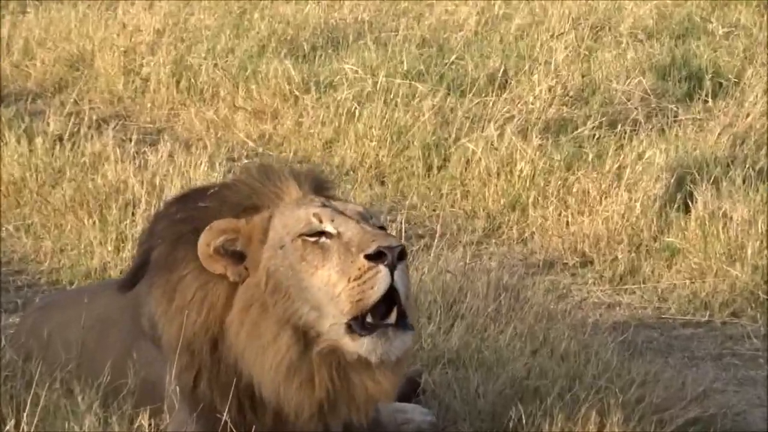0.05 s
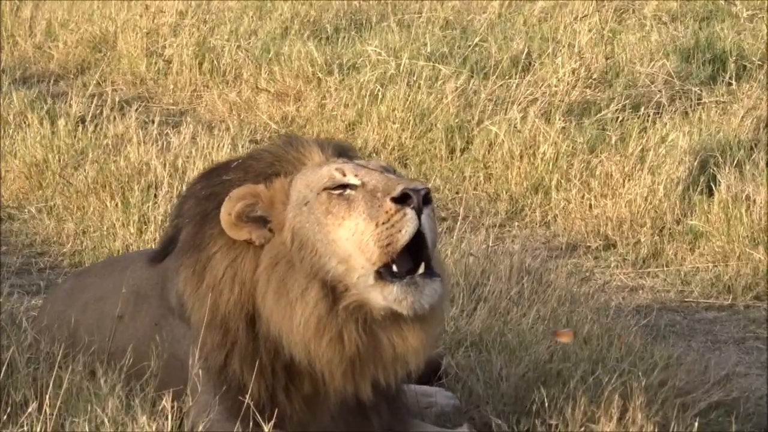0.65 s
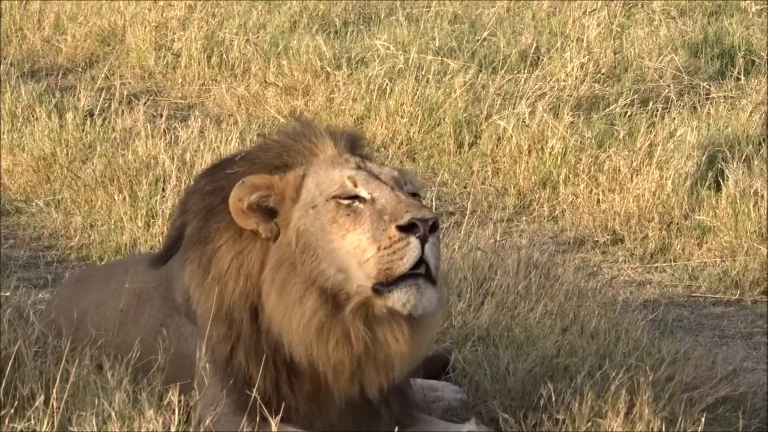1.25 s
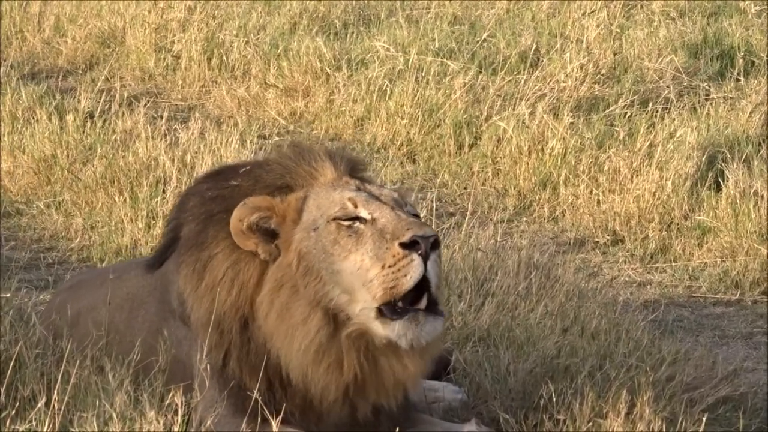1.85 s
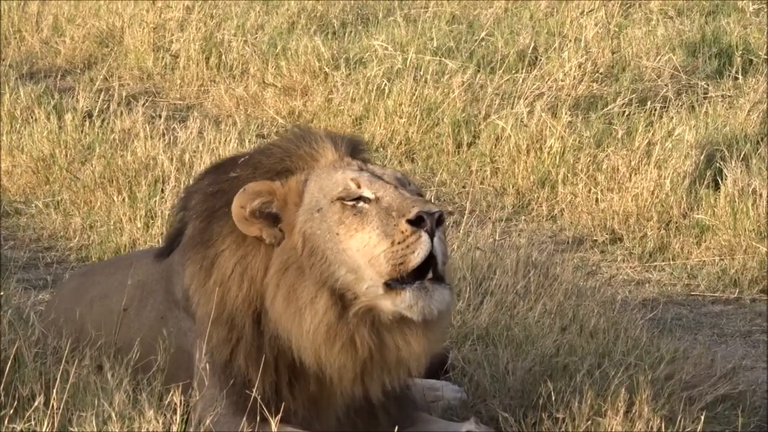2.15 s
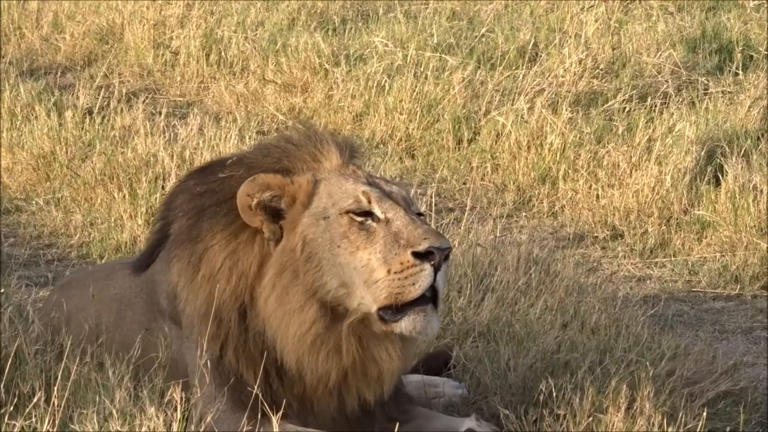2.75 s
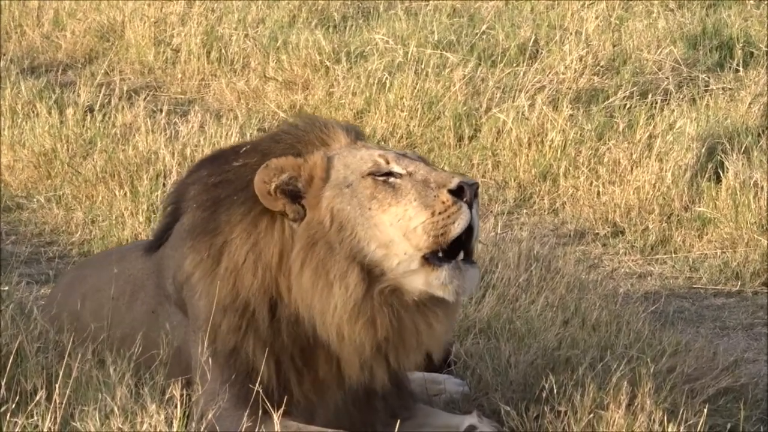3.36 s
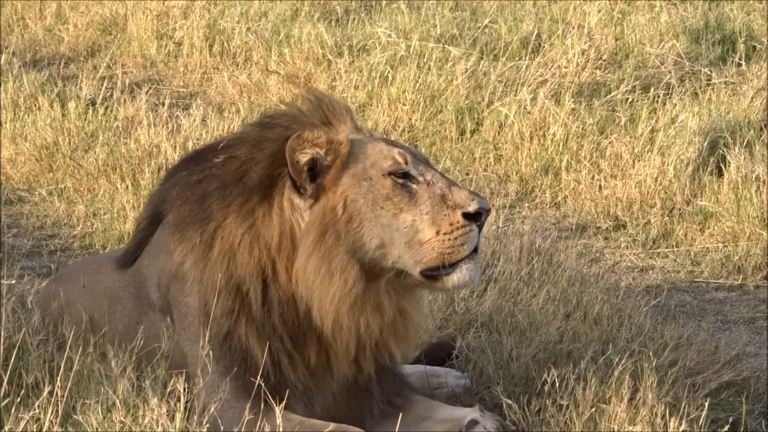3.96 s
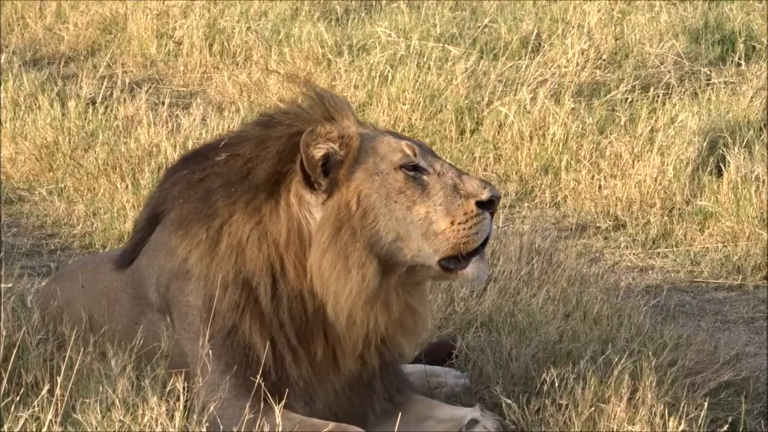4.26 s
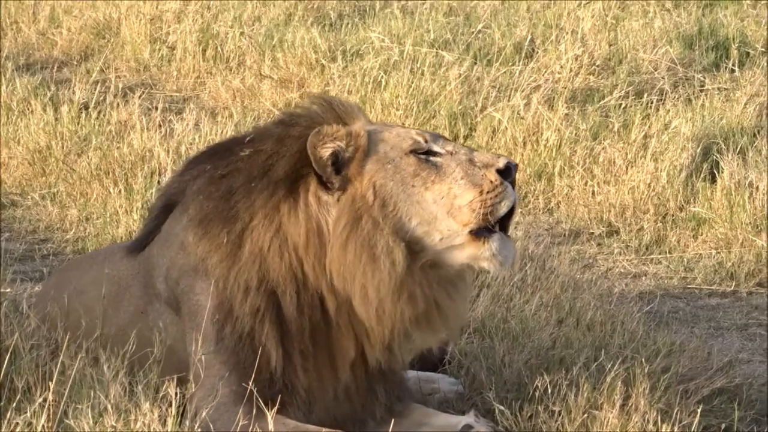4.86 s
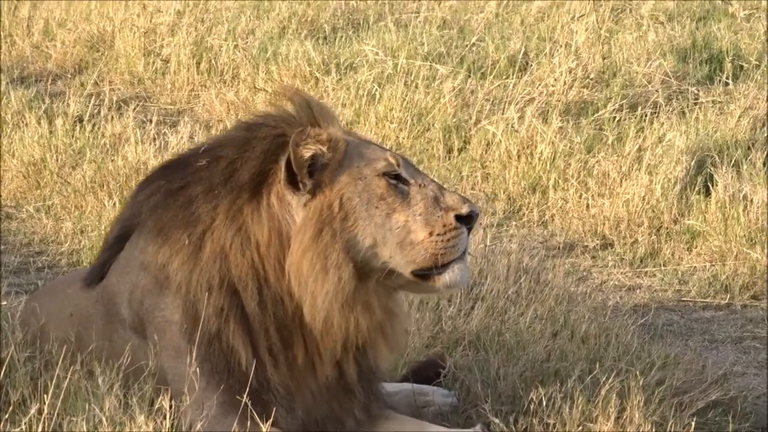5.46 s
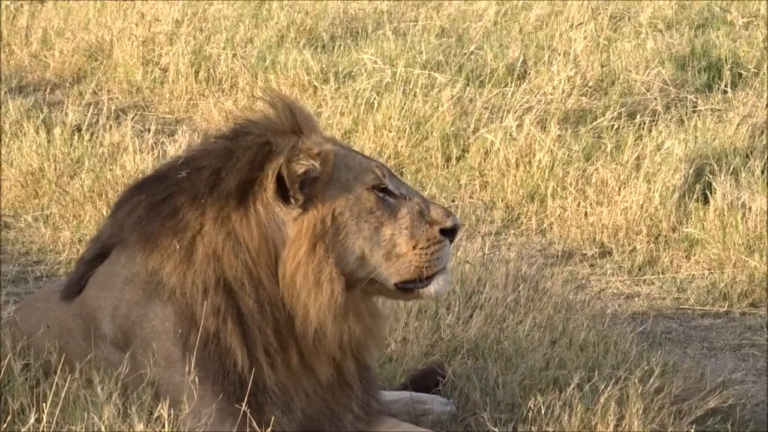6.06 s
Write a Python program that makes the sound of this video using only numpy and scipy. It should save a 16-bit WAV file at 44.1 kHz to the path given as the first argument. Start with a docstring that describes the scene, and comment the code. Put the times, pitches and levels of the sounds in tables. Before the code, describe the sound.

Close by outdoors, a lion roars once, then tapers into three rough grunts over a faint hiss.

```python
"""A dry snap sounds over the faint hiss of a plain, then a lion gives one long roar and three grunts.
The grunts are shorter and hoarser. Each call scoops up in pitch, holds, and sags after a last push of air.
The lion's slack vocal folds flap unevenly into a long throat; the open bush returns a low echo.
Dry grass rustles, something murmurs far off, a small bird chirps, and a dull tick comes last."""
import sys
import numpy as np
from scipy import signal
from scipy.fft import rfft, irfft
from scipy.io import wavfile
from scipy.ndimage import map_coordinates

SR = 44100
rng = np.random.default_rng(int(sys.argv[2]) if len(sys.argv) > 2 else 0)


def dump_mix(stems):
    """Bounce the given channels to the path in sys.argv[1] as a 16-bit WAV at rate SR."""
    frames = np.atleast_2d(stems).T  # one column per channel
    limited = np.clip(frames, -1, 1)  # hard clip at full scale
    pcm = np.round(limited * 32767).astype(np.int16)
    wavfile.write(sys.argv[1], SR, pcm)


N = 269892
T = np.arange(N) / SR
HZ = np.fft.rfftfreq(N, 1 / SR)


def gain_of(db):
    """Turns decibels into a factor to multiply by."""
    return 10 ** (np.asarray(db) / 20)


def evened(x):
    """Scales a sound to an average strength (rms) of 1."""
    return x / np.sqrt(np.mean(x ** 2) + 1e-20)


def steadied(x, span_s):
    """Evens out loudness changes slower than span_s and keeps the faster flutter."""
    window = signal.windows.hann(int(span_s * SR) | 1)
    power = signal.fftconvolve(x ** 2, window / window.sum(), "same")
    return x / np.sqrt(np.abs(power) + 1e-14)


def spectrum(points):
    """Joins (frequency, value) points into a curve over all frequencies."""
    hz, value = np.transpose(points)
    return np.interp(np.log(HZ + 1), np.log(hz + 1), value)


def add(mix, start_s, sound):
    """Mixes a sound in at the given time."""
    part = mix[round(start_s * SR):][:len(sound)]
    part += sound[:len(part)]


def bump(t, half_s):
    """A smooth swell of height 1 around time zero."""
    return np.exp(-(t / half_s) ** 2)


def noise(gain):
    """Noise of strength 1, shaped by a gain for each frequency."""
    return evened(irfft(rfft(rng.standard_normal(N)) * gain, N))


def wander(hz):
    """A random wobble, up to about hz times a second."""
    return noise(1 / (1 + (HZ / hz) ** 4))


def humps(modes):
    """Gain curve of resonances, the places where something rings: (frequency, width, level)."""
    return np.sqrt(sum(gain_of(db) ** 2 / (1 + ((HZ - hz) / (0.48 * width)) ** 2) ** 2
                       for hz, width, db in modes))


def colour(x, gain):
    """Filters by a gain curve so that resonances ring after each pulse, never before it."""
    cepstrum = irfft(np.log(gain / gain.max() + 1e-5), N)
    return irfft(rfft(x) * np.exp(rfft(2 * cepstrum[:N // 2], N)), N)


def resonate(x, hz, width):
    """Rings one resonance that slides along the curve hz."""
    spin = np.exp(2j * np.pi * np.cumsum(hz) / SR)
    decay = np.exp(-np.pi * width / SR)
    return 2 * (spin * signal.lfilter([1 - decay], [1, -decay], x / spin)).real


def above(x, hz):
    """Keeps only what lies above hz."""
    return signal.sosfilt(signal.butter(4, hz, "highpass", fs=SR, output="sos"), x)


def bend(x, factor):
    """Slides every resonance of a steady sound by a slowly changing factor."""
    return map_coordinates(x, [np.cumsum(factor)], order=3, mode="mirror")


# The tone colour of the plain's hiss: (frequency [Hz], relative level [dB])
HISS_SPECTRUM = [(40, -38), (210, -17.5), (370, -14), (450, 1.5), (570, 0), (730, -5), (800, 1.5),
                 (900, -11.5), (1080, -8.5), (1230, 2), (1700, -14.5), (2080, -15), (2350, 0.5), (2490, -8),
                 (2760, 0), (3200, -16), (4700, -20.5), (6400, -40)]


def plain_hiss(peak_s=3.05, peak_db=-54, sag_db=-5):
    """A faint, wide hiss that swells once, slowly."""
    shape = gain_of(spectrum(HISS_SPECTRUM)) / (1 + (HZ / 7500) ** 8)
    hiss = 0.44 * noise(shape) + 0.63 * np.array([noise(shape) for side in range(2)])
    fizz = np.array([noise(humps([(9950, 4600, 0)])) for side in range(2)])
    swell_db = peak_db + sag_db * ((T - peak_s) / peak_s) ** 2
    return (hiss + gain_of(-23.5) * fizz) * gain_of(swell_db + .5 * wander(6.7))


# When the far murmur is heard: (start [s], end [s], level [dB])
MURMURS = [(0, 2.5, -64), (3.051, 3.92, -57.5)]


def far_murmur(fade_db_per_s=121):
    """A faint low murmur that comes and goes far off."""
    loudness = sum(gain_of(db - fade_db_per_s * abs(T - np.clip(T, start, end)))
                   for start, end, db in MURMURS)
    murmur = noise(humps([(144, 33, 4), (200, 30, -20.5), (307, 520, -14.5)]))
    return steadied(murmur, .25) * loudness


# Stirrings of the grass: (start [s], length [s], level [dB])
RUSTLES = [(2.255, 0.036, -56.5), (2.952, 0.087, -58), (3.573, 0.042, -57.5)]


def grass_rustles():
    """Dry grass rustles in short swells of high noise."""
    loudness = np.zeros(N)
    for start, length, db in RUSTLES:
        add(loudness, start, gain_of(db) * signal.windows.hann(int(length * SR)))
    return loudness * noise(humps([(4120, 850, 0)]))


def bush_echo(x, far_db=-31, grass_db=-17, low_fade_s=1.82, high_fade_s=0.56, grass_fade_s=0.12):
    """Nearby grass scatters the treble; far trees return an echo whose bass lingers longest."""
    out = []
    for side in range(2):
        low = noise(humps([(128, 54, 0)])) * gain_of(-60 * T / low_fade_s)
        high = noise(1 / (1 + (HZ / 2200) ** 2)) * gain_of(-60 * T / high_fade_s)
        far = (0.023 * low + high) * np.clip(T / 0.022, 0, 1)
        near = noise(np.minimum(HZ, 4000)) * gain_of(-60 * T / grass_fade_s)
        echo = gain_of(far_db) * far / np.linalg.norm(far)
        echo += gain_of(grass_db) * near / np.linalg.norm(near)
        out.append(signal.fftconvolve(x, echo)[:N])
    return np.array(out)


# Bird notes: (start [s], length [s], first pitch [Hz], last pitch [Hz], relative level [dB])
CHIRPS = [(4.304, 0.02, 3650, 2830, -61), (4.396, 0.035, 4040, 4540, -59.5),
          (4.423, .06, 3174, 2630, -51.5), (4.586, 0.03, 4200, 3694, -48.5), (4.614, .025, 2994, 3957, -51),
          (4.623, 0.058, 3730, 2400, -51)]


def bird(lift=0.0484, husk=0.028):
    """Quick gliding whistles; the pitch lifts in mid-note and wavers, which sounds husky."""
    out = np.zeros(N)
    for start, length, first_hz, last_hz, db in CHIRPS:
        progress = np.linspace(0, 1, int(length * SR))
        arch = np.abs(np.sin(np.pi * progress))
        glide_hz = first_hz + (last_hz - first_hz) * progress
        hz = glide_hz * (1 + lift * arch + husk * wander(400)[:len(progress)])
        add(out, start, gain_of(db) * np.sqrt(2 * arch) * np.sin(2 * np.pi * np.cumsum(hz) / SR))
    return out * gain_of(3 * wander(200))


# The tones in a sharp snap and a dull tick: (frequency [Hz], level [dB], time to fade by 60 dB [s])
SNAP_TONES = [(2530, -40, 0.013), (2710, -27, 0.022), (4700, -32.5, 0.016), (9850, -44, 0.006)]
TICK_TONES = [(514, -32.5, 0.0067), (1210, -32, 0.0097), (1670, -46.5, 0.027), (2360, -40.5, 0.016),
              (3760, -58.5, .09)]


def dry_click(start_s, tones, crack_db, rise_s=0.00016, crack_fade_s=0.017):
    """A small dry click: a burst of splintering noise and a few briefly ringing tones."""
    t, out = T[:SR // 5], np.zeros(N)
    crack = gain_of(crack_db - 60 * t / crack_fade_s) * rng.standard_normal(len(t))
    ring = sum(gain_of(db - 60 * t / fade_s) * np.cos(2 * np.pi * hz * t) for hz, db, fade_s in tones)
    add(out, start_s, (1 - np.exp(-t / rise_s)) * (crack + ring))
    return above(out, 340)


# How much louder the lion is on the left than the right: (frequency [Hz], level gap [dB])
LEFT_LEVEL = [(60, -0.5), (96, -1), (150, 1), (250, -1.5), (400, 0.5), (640, -4), (1030, -0.5),
              (1650, -7.5), (2650, -3.5), (4260, -4), (6840, -10), (11000, 0.5)]
# How far the left wave runs ahead of the right: (frequency [Hz], phase lead [radians])
LEFT_LEAD = [(80, .5), (300, .58), (500, .75), (1000, .55), (3000, 0), (5300, -1.3), (7300, -3.9),
             (10300, -5.4)]


def left_and_right(x):
    """Spreads a sound over two sides, each with its own level and timing."""
    half = gain_of(spectrum(LEFT_LEVEL) / 2) * np.exp(.5j * spectrum(LEFT_LEAD))
    pair = np.array([half, 1 / half])
    return irfft(rfft(x) * pair / np.maximum(abs(pair.mean(0)), .5), N)


# Whistles as the throat opens or closes: (start [s], length [s], level [dB])
SQUEAKS = [(0.4, 0.069, -25), (1.184, .022, -36), (2.238, 0.011, -32.5), (3.261, 0.039, -28.5),
           (4.971, 0.038, -46)]


def throat_squeaks(pitch_hz=1083):
    """Short wavering whistles of air through the narrowed throat."""
    out = np.zeros(N)
    for start, length, db in SQUEAKS:
        count = int(length * SR)
        cycles = np.cumsum(pitch_hz * (1 + 0.0067 * wander(80)[:count])) / SR
        swell = np.sqrt(2 * signal.windows.hann(count))
        add(out, start, gain_of(db) * swell * np.sin(2 * np.pi * cycles))
    return out


def fold_pulses(cycles, rough, uneven_db=10.5, slip_periods=.45):
    """One sharp pulse each time the vocal folds close, uneven in size and time in a rough voice."""
    closings = np.flatnonzero(np.diff(np.floor(cycles)) > 0)
    size, slip = rng.standard_normal((len(closings), 2)).T
    shift = (slip * rough[closings] ** 2 * slip_periods * N / len(closings)).astype(int)
    size_db = uneven_db * np.sqrt(rough[closings]) * np.tanh(size)
    out = np.zeros(N)
    out[np.clip(closings + shift, 0, N - 1)] = gain_of(size_db)
    return evened(out)


def chest_tone(cycles, rough, drive):
    """The deep note of the chest: nearly pure when the voice is smooth, shaky when it is rough."""
    tone = np.sin(2 * np.pi * cycles) + 0.32 * rough * np.sin(4 * np.pi * cycles)
    tone *= gain_of(22.5 * rough ** 1.34 * wander(46))
    boom = rough * evened(colour(drive, humps([(133.5, 21.3, -0.5), (199, 21, -5.5)])))
    rumble = 0.029 * noise(humps([(55, 82, 0)]))
    return above(tone + boom, 95) + rumble


def throat_howl(pulses, puffs, throat_hz):
    """The throat howls on one narrow resonance, with wider ones around it."""
    howl = resonate(resonate(puffs, throat_hz, width=22), throat_hz, width=36)
    body = colour(pulses + 0.76 * puffs, humps([(218.5, 65, 3.5), (349, 68, 4.5), (497, 65, -3.5)]))
    return steadied(howl, 0.054) + .5 * evened(body)


# Where the long airway rings, above the howl: (frequency [Hz], width [Hz], relative level [dB])
AIRWAY_RESONANCES = [(474.7, 24.6, -2), (561.3, 31, -7), (668, 47, 1), (790.4, 46, 2.5), (897, 79, 4),
                     (981.6, 47, 6.5), (1073.4, 79, 8), (1164, 31, -6), (1333, 59, -2.5), (1417, 74, -5),
                     (1537, 72, -2), (1648, 17, -3), (1697, 47, -7.5), (1800, 74, -9.5)]
# What a wide open jaw adds: (frequency [Hz], width [Hz], relative level [dB])
OPEN_JAW_RESONANCES = [(940, 40, 0.5), (995, 51, 13.5), (1099, 58, 15), (1181, 31, 7.5), (1349, 62, 6.5),
                       (1875, 50, -10)]


def mouth_ring(drive, jaw):
    """The voice rings through the mouth; opening it wide favours the tones near 1000 Hz."""
    narrow = evened(colour(drive, humps(AIRWAY_RESONANCES)))
    wide = evened(colour(drive, humps(AIRWAY_RESONANCES + OPEN_JAW_RESONANCES)))
    return (1 - jaw) * narrow + jaw * wide


# The high, narrow resonances of the rasp: (frequency [Hz], width [Hz], relative level [dB])
RASP_RESONANCES = [(2024, 120, 0), (2208, 50, 3), (2427, 46, 3), (2528, 74, -1.5), (2670, 92, -3),
                   (3025, 60, -6), (3223, 53, -1.5), (3430, 50, -4.5), (3760, 54, -16), (3890, 66, -1.5),
                   (4166, 160, -6), (4550, 120, -5.5), (4790, 98, -5.5), (5120, 70, -7.5)]
# Air rushing past the teeth: (frequency [Hz], relative level [dB])
TEETH_SPECTRUM = [(1500, -32.5), (2200, -5.5), (3500, -12.5), (5100, -14), (5700, -21), (6300, -37),
                  (8000, -30.5), (8700, -26.5), (10300, -19.5), (11100, -31.5)]


def breath_rasp(pulses, puffs, flutter, throat_hz):
    """High resonances rise and fall a little with the throat while air hisses past the teeth."""
    rasp = colour(flutter * (puffs + .8 * pulses), humps(RASP_RESONANCES))
    stretch = (throat_hz / 350) ** .1 * (1 + .005 * wander(9))
    teeth = colour(flutter * puffs, gain_of(spectrum(TEETH_SPECTRUM)))
    return evened(bend(rasp, stretch)) + 0.5 * evened(teeth)


# The lion's calls: (start [s], rise time [s], scoop time [s], moment of last push [s], fall time [s],
# pitch [Hz], throat resonance [Hz], roughness [0-1], chest [dB], throat [dB], mouth [dB], rasp [dB],
# boost of last push [dB])
CALLS = [(.343, 0.034, 0.056, 1.076, .18, 143, 348.6, 0.22, -17.5, -20.5, -27.5, -38.5, 5.5),
         (1.984, 0.032, 0.073, 2.16, 0.15, 137, 362.3, 0.34, -21, -21, -28.5, -37, 2),
         (3.205, 0.032, .1, 3.44, 0.17, 139.3, 358.5, 0.31, -22, -21.5, -28.5, -37, 2.5),
         (4.666, 0.044, .08, 4.88, 0.12, 120.9, 310.3, .4, -26.5, -26, -33.5, -44, 1.5)]
# How far below full level a call starts, and how far it drops over its fall time:
# (chest [dB], throat [dB], mouth [dB], rasp [dB])
START_DB = [-41.5, -42.5, -38, -48]
FALL_DB = [-34.5, -36.5, -27, -26.5]
# Once a call the folds settle, so the chest swells and the howl gives way: (time [s], half-length [s])
SETTLES = [(0.552, 0.036), (2.122, .02), (3.371, .028), (4.8, 0.011)]
# The jaw drops wide only in the long roar: (time [s], opening [0-1])
JAW_OPENING = [(.42, 0), (.58, .2), (.72, 0.97), (.83, 0.81), (.99, 0.7), (1.04, 0)]


def effort(pitch_scoop=.3, pitch_sag=.27, throat_scoop=.18, throat_sag=.22, sag_s=.055, lag_s=.045):
    """Each call scoops up, holds, and sags as the air runs out; gives the curves that steer the voice."""
    calls = np.array(CALLS)
    current = calls[np.searchsorted(calls[1:, 0], T + .1)]  # a row takes over 0.1 s before its start
    start, rise_s, scoop_s, push_at, fall_s, top_hz, howl_hz, hoarse, *full_db, push_db = current.T
    age, since_push = T - start, np.maximum(T - push_at, 0)

    jaw = np.interp(T, *np.transpose(JAW_OPENING))
    settled = sum(bump(T - time, half_s) for time, half_s in SETTLES)
    strain = bump(T - push_at, .03)  # the last push strains the voice
    scoop = np.exp(-np.maximum(age, 0) / scoop_s)
    sag, late_sag = (.5 + .5 * np.tanh(.5 * (T - push_at - lag) / sag_s) for lag in (0, lag_s))
    pitch_hz = top_hz * (1 - pitch_scoop * scoop) * (1 - pitch_sag * sag) * (1 + .025 * jaw)
    throat_hz = howl_hz * (1 - throat_scoop * scoop) * (1 - throat_sag * late_sag)
    throat_hz *= 1 + 0.0417 * jaw - 0.059 * strain
    # the folds flap more unevenly as they start and stop
    rough = hoarse + .35 * scoop + .15 * late_sag + .15 * strain
    rough = np.clip(rough * (1 - .25 * settled), .02, 1)

    # the howl surges just after the throat opens, and rebounds briefly during the fall
    surge, rebound = bump(age - 0.1, 0.042), bump(since_push - 0.092, 0.014)
    shove_db = push_db * bump(T - push_at, .018)
    accents_db = [-4 * surge + 6 * settled - 5.5 * jaw ** 4,  # chest
                  4.5 * surge - 4.5 * settled + 8 * rebound,  # throat
                  0.7 * surge + 8.5 * jaw + shove_db,  # mouth
                  2 * surge + shove_db]  # rasp
    onset = np.exp(-age / rise_s)
    fall = (since_push / fall_s) ** 1.18  # the fall starts gently
    levels_db = [full + accent + start_db * onset + fall_db * fall
                 for full, accent, start_db, fall_db in zip(full_db, accents_db, START_DB, FALL_DB)]
    return pitch_hz, rough, throat_hz, jaw, levels_db


def lion():
    """Pulses from the vocal folds and puffs of rushing air ring the chest, throat and mouth."""
    pitch_hz, rough, throat_hz, jaw, levels_db = effort()
    cycles = np.cumsum(pitch_hz * (1 + .07 * rough * wander(60))) / SR
    # the heavy folds also flutter slowly, which gives the growl
    flutter = gain_of(2 * noise(humps([(32.6, 130, 0)])))
    puffs = evened((.4 + np.exp(-(cycles % 1) / .35)) * rng.standard_normal(N))
    pulses = fold_pulses(cycles, rough)
    air_share = .04 + .65 * rough
    drive = flutter * (np.sqrt(1 - air_share) * pulses + np.sqrt(air_share) * puffs)
    parts = [chest_tone(cycles, rough, drive), throat_howl(pulses, puffs, throat_hz),
             mouth_ring(drive, jaw), breath_rasp(pulses, puffs, flutter, throat_hz)]
    return sum(gain_of(db) * steadied(part, .08) for part, db in zip(parts, levels_db))


def scene():
    """The lion close by, with the bush and the plain around it."""
    roar, chirps = lion() + throat_squeaks(), bird()
    snap = dry_click(.1977, SNAP_TONES, crack_db=-43)
    tick = dry_click(5.673, TICK_TONES, crack_db=-73, rise_s=0.00043)
    echo = bush_echo(roar + 9 * chirps)  # the far bird is heard mostly through the bush's scatter
    background = plain_hiss() + far_murmur() + grass_rustles()
    return background + echo + .45 * chirps + snap + tick + left_and_right(roar)


def record(dry, cutoff_hz=11150):
    """Cuts off the very highest treble."""
    lowpass = signal.firwin(511, cutoff_hz, window=("kaiser", 9), fs=SR)
    return signal.oaconvolve(dry, lowpass[None], "same")


dry = scene()
out = record(dry)
dump_mix(out)
```